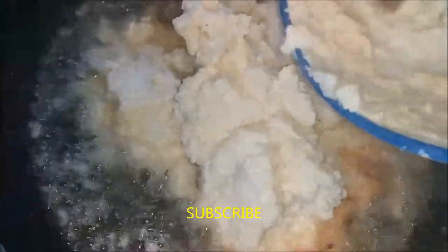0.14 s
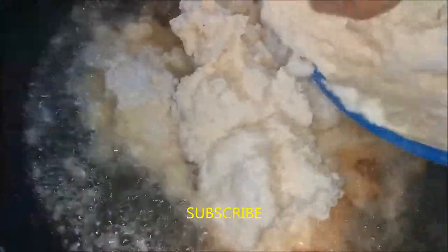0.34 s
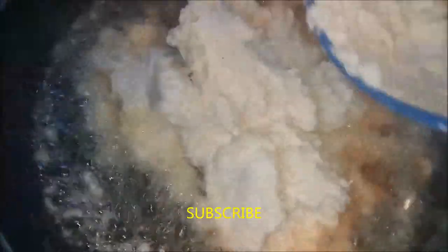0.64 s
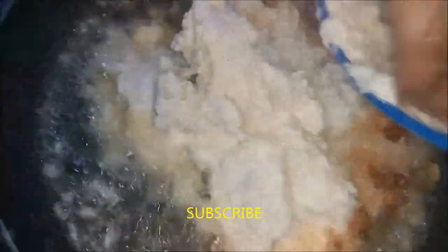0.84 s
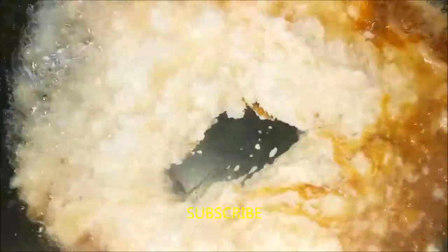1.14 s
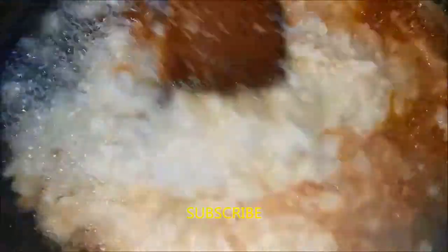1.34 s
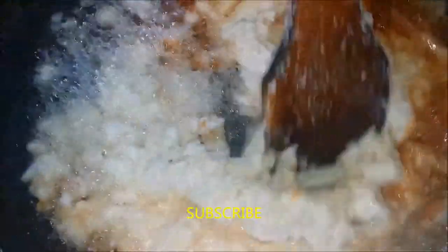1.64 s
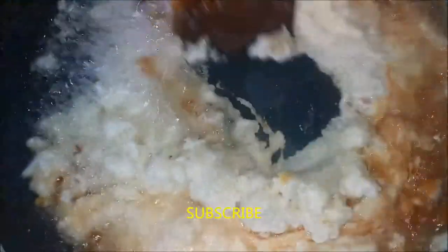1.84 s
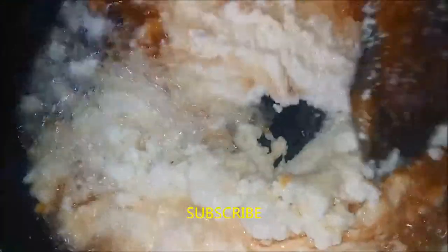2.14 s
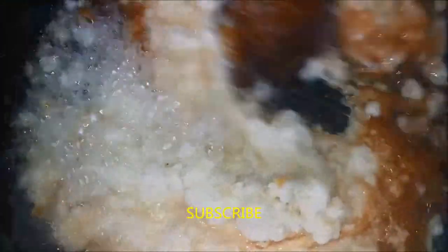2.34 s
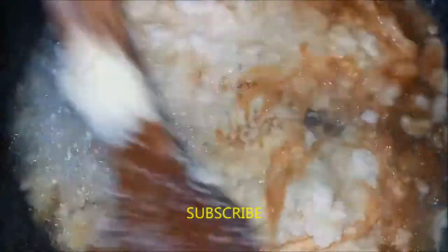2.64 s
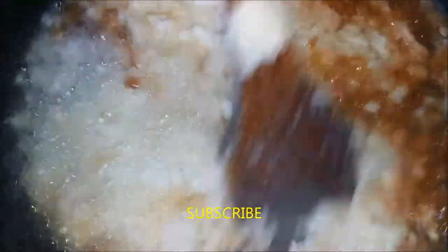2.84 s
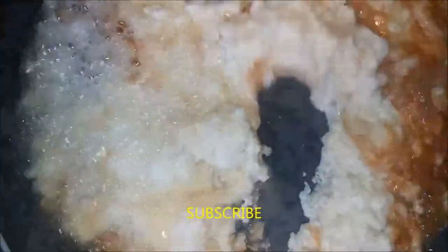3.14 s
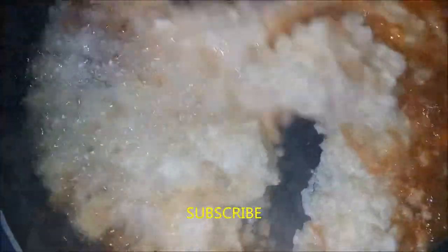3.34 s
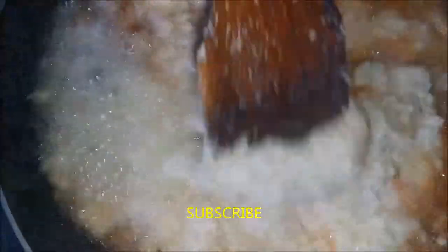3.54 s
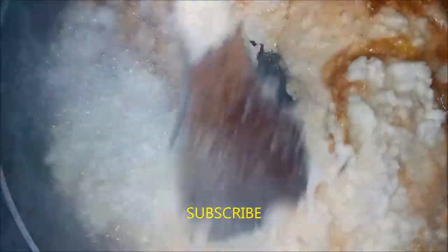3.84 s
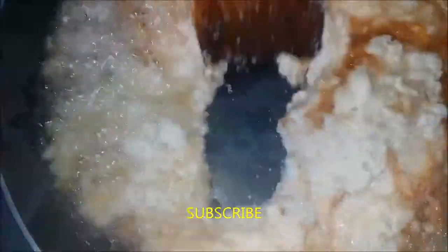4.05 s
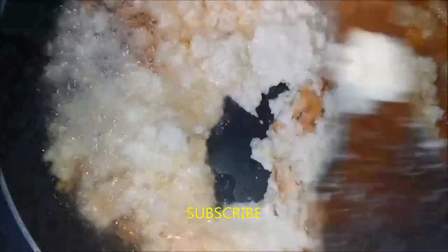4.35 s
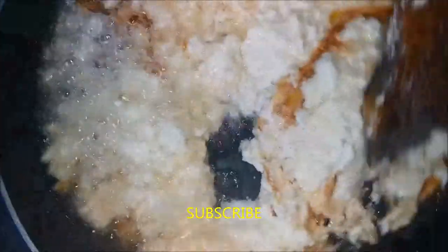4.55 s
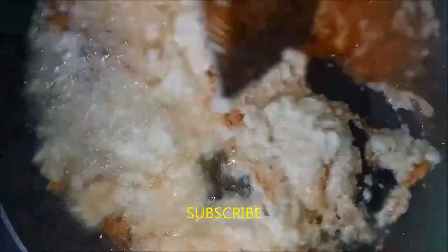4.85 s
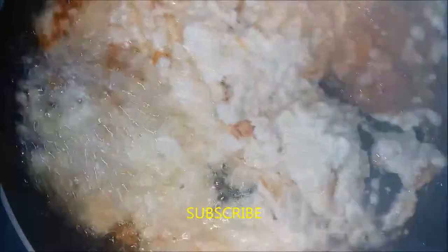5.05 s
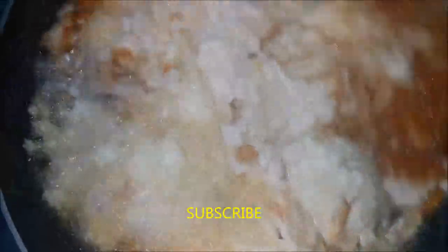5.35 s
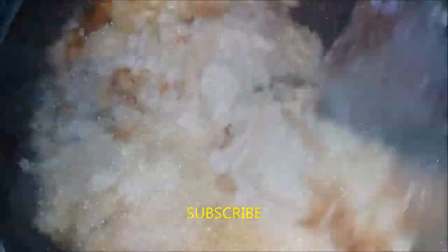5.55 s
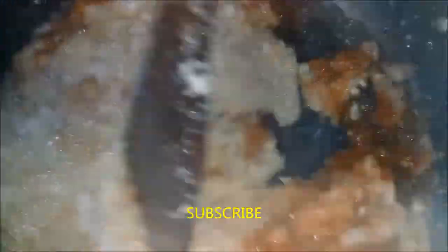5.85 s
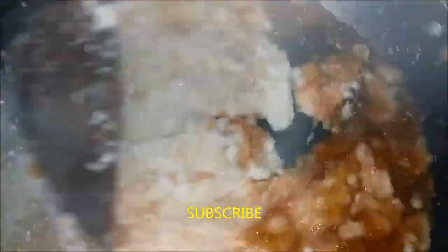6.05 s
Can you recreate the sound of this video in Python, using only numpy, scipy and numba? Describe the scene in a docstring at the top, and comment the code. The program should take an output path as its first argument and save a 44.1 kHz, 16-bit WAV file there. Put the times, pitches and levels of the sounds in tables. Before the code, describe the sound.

Loud, dense sizzling in a pan cuts suddenly to a finer, crisp frying fizz, with snapping drops, bursting steam pockets and soft wooden taps.

```python
"""Hot oil and syrup boil hard, close by, for about a second as wet semolina slides in: ringing bubbles and clicks.
After a cut the pan is being stirred: fine damped-sine bubbles and clicks fizz on the metal, slower ones simmer.
Water drops spit (snap, ringing cavity, noise), steam pockets pop (short sine swings), squeezed steam bubbles
sink in pitch, and a wooden spatula knocks dully (damped pan modes). Filtered noise is the low stove rumble."""
import sys
import numpy as np
from scipy import signal
from scipy.fft import rfft, irfft
from scipy.io import wavfile
from scipy.ndimage import uniform_filter1d
from numba import njit

SR = 44100
rng = np.random.default_rng(int(sys.argv[2]) if len(sys.argv) > 2 else 0)


def master_out(mix):
    """Clip the mix to full scale and print it as 16-bit PCM to the path in sys.argv[1]."""
    frames = np.transpose(np.atleast_2d(mix))
    ceiling = np.clip(frames, -1, 1)
    pcm = np.round(ceiling * 32767).astype(np.int16)
    wavfile.write(sys.argv[1], SR, pcm)


N = 273420
TIME = np.arange(N) / SR
BOIL_END_S = .94


def undb(db):
    """Logarithmic level: decibels to amplitude gain."""
    return 10 ** (np.asarray(db) / 20)


def unit(x):
    """Normalisation of power: scale to rms 1."""
    return x / np.sqrt(np.mean(x ** 2))


def curves(table):
    """Linear interpolation: the columns of a table joined by straight lines in time."""
    s, *columns = np.transpose(table)
    return [np.interp(TIME, s, column) for column in columns]


def add(out, s, sound, db):
    """Superposition: mix a sound in at a time; db is the rms of its first 4 ms."""
    start = max(int(s * SR), 0)
    part = out[start:start + len(sound)]
    front = sound[:SR // 250]
    part += sound[:len(part)] * undb(db) / np.sqrt(np.mean(front ** 2))


def colour(x, points, size=4096):
    """Minimum-phase filtering through (Hz, dB) points: causal, so that clicks keep their sharp front."""
    hz, db = np.transpose(sorted(points))
    bins = np.maximum(np.arange(size // 2 + 1) * SR / size, 1)
    log_gain = np.log(undb(np.interp(np.log(bins), np.log(hz), db)))
    # folding the cepstrum onto positive time gives the minimum phase
    cepstrum = irfft(log_gain)
    cepstrum[1:size // 2] *= 2
    cepstrum[size // 2 + 1:] = 0
    response = irfft(np.exp(rfft(cepstrum)))
    return signal.fftconvolve(x, response)[:len(x)]


def walk(rate):
    """Random fluctuation: a new level every 1 / rate s, joined by ramps; rms 1."""
    hold = max(int(SR / rate), 1)
    levels = np.repeat(rng.standard_normal(N // hold + 1), hold)
    return unit(uniform_filter1d(levels, hold)[:N])


def fade(t, t60):
    """Exponential decay: down 60 dB after t60 seconds."""
    return np.exp(-np.log(1000) * t / t60)


def echoes(x, t60, db):
    """Reverberation: the direct sound and a dense noise tail of reflections, db relative to it."""
    t = TIME[:SR // 2]
    tail = rng.standard_normal(len(t)) * fade(t, t60) * (1 - fade(t, t60 / 10))
    return x + undb(db) * signal.fftconvolve(x, tail / np.linalg.norm(tail))[:len(x)]


@njit
def ring(starts, hz, cycles, sizes, glide):
    """Bubble resonance: each bubble is a damped sine that rises in pitch as it opens."""
    out = np.zeros(N)
    for k in range(len(starts)):
        length = int(cycles[k] * SR / hz[k]) + 2
        step = 2 * np.pi * hz[k] / SR
        # each sample turns and shrinks the phasor; the turn itself grows by the glide
        turn, bend = np.exp(1j * step - 5.75 / length), np.exp(1j * step * glide / length)
        phasor = sizes[k] + 0j
        for i in range(starts[k], min(starts[k] + length, N)):
            out[i] += phasor.imag
            phasor *= turn
            turn *= bend
    return out


def bubbles(per_s, low_hz, high_hz, cycles, spread_db, glide, cap=4.0):
    """Incoherent sum of ringing bubbles at random times, with even energy per Hz; spread_db makes sizes unequal."""
    when, pitch, life, size, side = rng.random((int(per_s * N / SR), 5)).T
    hz = low_hz * (min(high_hz, SR * .42) / low_hz) ** pitch
    turns = cycles * 2 ** (2 * life - 1)
    size_gain = undb(-spread_db * np.log(size + np.exp(-cap)))
    sizes = size_gain * hz / np.sqrt(turns) * np.sign(side - .5)
    return unit(ring((when * N).astype(np.int64), hz, turns, sizes, float(glide)))


def crackle(per_s, spread_db, cap=6.0):
    """Impulse noise: the tiniest bursts are bare clicks."""
    when, size, side = rng.random((int(per_s * N / SR), 3)).T
    sizes = undb(-spread_db * np.log(size + np.exp(-cap))) * np.sign(side - .5)
    return unit(np.bincount((when * N).astype(int), sizes, N))


# Vigour of the first hard boil. Each row: time in seconds, level in dB before the froth offset.
BOIL = [(0.0, -22), (0.224, -26.5), (0.458, -24.5), (0.656, -20.5), (0.764, -21.5), (0.93, -21.5)]
# Spectra of froth and spray. Each row: frequency in Hz, relative level in dB per Hz.
BOIL_COLOUR = [(60, -51), (110, -29), (300, -21.5), (700, -11.5), (880, -9.5), (1120, -6), (2100, 1),
               (3300, -5), (4700, -8.5), (6300, -22), (9000, -54)]
SPRAY_COLOUR = [(3500, -15), (6300, -4), (7300, -3), (8300, 2.5), (9200, -2.5), (10200, -10), (11200, -15),
                (12500, -5.5), (13800, -5), (15200, -7), (16000, -16)]
BOIL_USUAL_DB, FROTH_OFFSET_DB = -22, 1
SPRAY_DB, SPRAY_SLOPE = -32, 0.63  # level at time 0 and the usual boil; dB per dB of boil
SPRAY_RISE_DB_PER_S = 4.5  # the spray builds up as more paste slides in


def hard_boil():
    """Boiling by flash evaporation: water leaves the fresh paste in ringing bubbles and throws up a spray of oil."""
    vigour_db = curves(BOIL)[0]
    froth_db = vigour_db + FROTH_OFFSET_DB
    spray_db = SPRAY_DB + SPRAY_SLOPE * (vigour_db - BOIL_USUAL_DB) + SPRAY_RISE_DB_PER_S * TIME
    froth = bubbles(per_s=4500, low_hz=150.3, high_hz=7400, cycles=20, spread_db=0.0, glide=0.088)
    # a few big bubbles ring on longer, out of the froth
    big = bubbles(per_s=130, low_hz=1128, high_hz=3030, cycles=95, spread_db=3.0, glide=0.11, cap=1.9)
    froth = unit(unit(colour(froth, BOIL_COLOUR)) + undb(-9) * big)
    froth *= undb(froth_db + 0.59 * walk(45.7))
    spray = crackle(per_s=8100, spread_db=4.5)
    spray += undb(-7) * bubbles(per_s=3500, low_hz=5570, high_hz=16100, cycles=21, spread_db=1.0, glide=.05)
    spray = unit(colour(spray, SPRAY_COLOUR)) * undb(spray_db + 1.0 * walk(59.4))
    # first touch of the oil: a band of small bubbles that slowly weakens
    touch = bubbles(per_s=2500, low_hz=3650, high_hz=5470, cycles=27, spread_db=-0.5, glide=.08)
    return froth + spray + touch * undb(-32.0) * fade(TIME, 6.7)


# Spectrum of the rumble. Each row: frequency in Hz, relative level in dB per Hz.
STOVE_COLOUR = [(20, -36), (40, -24), (58, 7), (80, 0.5), (110, -1), (144, 11), (185, 0.5), (300, -21),
                (600, -21.5)]


def stove():
    """Filtered noise with random modulation: a low, slightly unsteady rumble."""
    rumble = unit(colour(rng.standard_normal(N), STOVE_COLOUR))
    return rumble * undb(-59 + 2.0 * walk(5.76))


# Single water drops, loud and soft, at set times. Each row: start in seconds, level in dB before a small trim,
# pitch in Hz, share of ringing from 0 to 1.
SPITS = [(0.1021, -25, 12500, 0.7), (0.2071, -17.5, 2180, 0.83), (0.5085, -25, 13200, 0.95),
         (0.567, -22.5, 12700, 0.4), (0.6512, -19.5, 13000, 0.83), (0.7808, -21.5, 8800, 0.2),
         (0.99, -22, 6460, 0.2), (1.0828, -23.5, 1880, 0.04), (1.2101, -24, 12600, 0.7),
         (1.296, -24.5, 12800, 0.97), (1.541, -20.5, 3380, 0.15), (1.6117, -20.5, 8900, 0.98),
         (2.1076, -29, 12800, 0.5), (2.2027, -24, 7580, 0.05), (2.4771, -18.5, 8100, 0.17),
         (2.5748, -19, 8270, 0.1), (2.794, -25.5, 5510, 0.8), (2.8432, -27, 2210, 0.7),
         (3.0365, -26.5, 7300, 0.95), (3.308, -28, 7670, 0.2), (3.4864, -26.5, 5700, 0.65),
         (3.5627, -31, 1750, 0.93), (3.7078, -21, 5000, 0.3), (3.9622, -25, 4570, 0),
         (4.17, -22.5, 5900, 0.9), (4.2529, -24, 7200, 0.98), (4.3135, -27, 8180, 0.44),
         (4.3513, -28.5, 2110, 1), (4.4371, -20, 12750, 0.96), (5.0369, -28, 5770, 1),
         (5.2892, -27.5, 4820, 0.2), (5.5038, -21, 6760, 0.5), (6.09, -23, 6760, 0.3)]
# Spectral tilt of every spit. Each row: frequency in Hz, gain in dB.
SPIT_COLOUR = [(100, -13.5), (600, -2), (1800, 6.5), (3000, 2), (5000, 2.5), (8300, 5), (10000, -6.5),
               (12800, 0.5), (16000, -6.5)]


def spits():
    """Vapour explosion: a sharp snap, a brief cavity ring and a splatter burst out together."""
    out, t = np.zeros(N), TIME[:2048]
    for s, db, hz, ringing in SPITS + stray_drops():
        ringing = np.clip(ringing, 0, 1)
        snap = np.cos(2 * np.pi * hz * t) * fade(t, 4.5 / hz)
        cavity = np.sin(2 * np.pi * hz * t * (1 + 15 * t)) * fade(t, 17 / hz)
        # the splatter's faint tail, off the pan wall, fades slowest
        splatter = rng.standard_normal(len(t)) * (fade(t, 0.0054) + undb(-18.5) * fade(t, 0.042))
        burst = unit(snap) + undb(7) * unit(splatter)
        spit = np.sqrt(1 - ringing) * burst + np.sqrt(ringing) * unit(cavity)
        add(out, s, colour(spit, SPIT_COLOUR), db + 0.14)
    return out


# Steam pockets bursting through the paste. Each row: start in seconds, level in dB before an offset,
# pitch in Hz, crack level in dB relative to the burst.
POPS = [(0.102, -21.5, 900, -8), (0.518, -20, 700, -8), (0.6512, -19.5, 905, 0), (2.5747, -17.5, 1380, -9),
        (2.7745, -10.5, 1310, 9.5), (3.7072, -23, 1250, -10), (3.8043, -25.5, 1700, -14),
        (4.655, -26, 1000, -14), (4.7973, -22.5, 905, -11), (5.1994, -13, 1180, -18),
        (5.9052, -23.5, 900, -14)]


def pops():
    """Pressure release: a steam pocket tears with a crack and a quick swing; the paste slumps back behind it."""
    out, t = np.zeros(N), TIME[:4096]
    for s, db, hz, crack_db in POPS:
        crack = undb(crack_db) * np.sin(2 * np.pi * 5600 * t) * fade(t, 0.00045)
        burst = np.sin(2 * np.pi * hz * t) * fade(t, 2.2 / hz)
        slump = undb(-10.5) * np.sin(2 * np.pi * 185 * t) * fade(t, 0.0077)
        wobble = undb(-51) * np.sin(2 * np.pi * 72 * t) * fade(t, .12)
        add(out, s, slump + wobble - crack - burst, db - 8.5)
    return out


# Spatula against the pan. Each row: start in seconds, level in dB before a small trim.
KNOCKS = [(0.145, -39), (0.254, -34.5), (1.124, -27.5), (3.803, -32.5), (4.370, -28.5), (4.389, -35)]
# The pan, damped by the paste. Each row: frequency in Hz, relative level in dB, 60 dB decay time in seconds.
PAN_MODES = [(268, -12, 0.23), (370, 4, 0.023), (462, -2, 0.055), (624, 3, 0.027), (1160, 1.5, .025),
             (1890, 2, 0.013)]


def spatula():
    """Modal excitation: wood meets the pan through a cushion of paste and wakes its low modes."""
    out, t = np.zeros(N), TIME[:SR // 3]
    for s, db in KNOCKS:
        knock = np.zeros(len(t))
        for k, (hz, mode_db, t60) in enumerate(PAN_MODES):
            # neighbouring modes start in opposite phase
            knock += (-1) ** k * undb(mode_db) * np.sin(2 * np.pi * hz * t) * fade(t, t60)
        add(out, s, knock, db - .5)
    return out


WET_UNTIL_S, DRYING_S = 1.62, 0.14  # middle and length of the drying


def wetness():
    """Drying as a linear ramp: 1 while the paste is still wet, 0 once it has dried."""
    return np.clip((WET_UNTIL_S - TIME) / DRYING_S + .5, 0, 1)


# Flares where the spatula bares the metal. Each row: start in seconds, hold in seconds, then the changes
# of fizz, mist and medium bubbles in dB.
FLARES = [(1.19, 0.074, 0, 2.5, 3.5), (1.55, 0.097, 2, 3.5, -3), (2.15, 0.061, -2, 0, 5),
          (2.8, 0.071, -1.5, 0, 3), (3.26, 0.14, 2.5, 2, -0.5), (3.833, 0.026, 2, 7.5, 7.5),
          (4.074, 0.072, 0, 0, 5), (4.454, 0.18, 3, 5.5, -1), (5.504, 0.12, 1.5, 2, 0)]
FLARE_ATTACK_S, FLARE_RELEASE_S = 0.015, 0.05  # ramp; exponential time constant after the hold


def flares():
    """Contact boiling: paste lands on bared metal; fizz, mist and medium bubbles shift, hold, die back (dB)."""
    boosts = np.zeros((3, N))
    for s, hold, *boost_db in FLARES:
        attack = np.clip((TIME - s) / FLARE_ATTACK_S, 0, 1)
        release = np.exp(-np.maximum(TIME - s - hold, 0) / FLARE_RELEASE_S)
        boosts += np.outer(boost_db, attack * release)
    return boosts


# Vigour of the frying while stirred. Each row: time in seconds, level in dB.
FRY = [(0.96, -29.5), (1.34, -33), (2.89, -32), (3.06, -35), (3.47, -38), (3.76, -38), (4.07, -34),
       (4.4, -34.5), (4.62, -31), (4.99, -33), (5.18, -32.5), (5.72, -31), (5.97, -32.5), (6.2, -32.5)]
FRY_USUAL_DB = -33
# base levels at the usual vigour; the last is a boost of medium bubbles
FIZZ_DB, SIMMER_DB, MIST_DB, MEDIUM_DB = -33.5, -36.5, -44.5, 1.3
FIZZ_SLOPE, SIMMER_SLOPE, MIST_SLOPE, MEDIUM_SLOPE = 1.23, 0.79, 1.15, -0.1  # dB per dB of frying
WET_FIZZ_DB, WET_SIMMER_DB, WET_MIST_DB, WET_MEDIUM_DB = 1.7, -0.7, -1.0, -4  # what wet paste adds
MIST_RISE_DB_PER_S, SIMMER_FALL_DB_PER_S = 0.53, 0.16  # both as the paste dries out


def fry_levels():
    """Heat and moisture control: vigour and wetness set fizz, simmer, mist and medium bubbles (dB)."""
    vigour = curves(FRY)[0] - FRY_USUAL_DB
    wet = wetness()
    fizz_flare, mist_flare, medium_flare = flares()
    fizz_db = FIZZ_DB + FIZZ_SLOPE * vigour + WET_FIZZ_DB * wet + fizz_flare
    simmer_db = SIMMER_DB + SIMMER_SLOPE * vigour + WET_SIMMER_DB * wet - SIMMER_FALL_DB_PER_S * TIME
    mist_db = MIST_DB + MIST_SLOPE * vigour + WET_MIST_DB * wet + MIST_RISE_DB_PER_S * TIME + mist_flare
    medium_db = MEDIUM_DB + MEDIUM_SLOPE * vigour + WET_MEDIUM_DB * wet + medium_flare
    return fizz_db, simmer_db, mist_db, medium_db


WET_COARSE_DB, DRY_COARSE_DB = 0.5, -4.0  # gain of the coarsest fizz bubbles in wet and in dry paste


def band(x, low_hz, high_hz):
    """Zero-phase band-pass filtering: the band stays in step with its source."""
    return signal.sosfiltfilt(signal.butter(2, [low_hz, high_hz], "band", fs=SR, output="sos"), x)


def thin_coarse(fizz):
    """Moisture-limited bubble growth: the share of coarse bubbles in the fizz falls as the paste dries."""
    coarse_db = DRY_COARSE_DB + (WET_COARSE_DB - DRY_COARSE_DB) * wetness()
    return fizz + (undb(coarse_db) - 1) * band(fizz, 2600, 3900)


# Spectra of simmer, fizz and mist. Each row: frequency in Hz, relative level in dB per Hz.
SIMMER_COLOUR = [(120, -37), (200, -15.5), (326, -11.5), (432, -6.5), (650, -3.5), (843, -5.5), (923, 0),
                 (1300, -2), (1570, 1), (2450, -4.5), (3000, -12.5), (3900, -14), (6600, -120)]
FIZZ_COLOUR = [(1500, -32), (2500, -8), (3400, 0.5), (4100, -1), (4800, -0.5), (5800, -2.5), (7200, 1),
               (8200, 3.5), (8700, -1), (9300, -8), (10000, -17.5), (11500, -30), (15000, -57)]
MIST_COLOUR = [(6000, -42), (9500, -12), (10800, -5.5), (12500, 0), (14500, -4), (16000, -5)]


def frying():
    """Nucleate boiling: slow bubbles simmer in the paste; on bare metal they are small, quick and crackling."""
    fizz_db, simmer_db, mist_db, medium_db = fry_levels()
    flurry_db = .5 * walk(40)
    clicks = echoes(crackle(per_s=2400, spread_db=3.0), t60=0.022, db=1)
    simmer = bubbles(per_s=4500, low_hz=198.0, high_hz=3510, cycles=11.6, spread_db=2.0, glide=0.13)
    simmer = unit(colour(simmer + undb(-5.5) * clicks, SIMMER_COLOUR))
    fizz = bubbles(per_s=5000, low_hz=2160, high_hz=10920, cycles=13.7, spread_db=3.0, glide=0.075, cap=6.0)
    fizz = unit(colour(fizz + undb(-1.0) * clicks, FIZZ_COLOUR))
    # the share of medium-sized bubbles changes as the spatula bares and covers the metal
    medium = band(fizz, 4400, 7200)
    fizz = thin_coarse(fizz) + (undb(medium_db) - 1) * medium
    # the finest mist has sparse, very sharp ticks of its own
    ticks = echoes(crackle(per_s=250, spread_db=13.0, cap=4.1), t60=0.009, db=-17)
    mist = bubbles(per_s=5500, low_hz=8700, high_hz=16500, cycles=12, spread_db=9.5, glide=.03)
    mist = unit(colour(mist + undb(3) * clicks + undb(-9.0) * ticks, MIST_COLOUR))
    # final balance of the three layers, in dB
    return (simmer * undb(simmer_db + flurry_db - 0.88)
            + fizz * undb(fizz_db + flurry_db - 0.57)
            + mist * undb(mist_db + flurry_db + 2.0))


def spatter():
    """Random point process: smaller drops go off many times a second, following the level of the fizz."""
    fizz_db = fry_levels()[0]
    pings = bubbles(per_s=32, low_hz=3800, high_hz=8500, cycles=20, spread_db=2.2, glide=.05, cap=2.5)
    snaps = echoes(crackle(per_s=26, spread_db=2.0, cap=2.5), t60=.008, db=-5)
    snaps = unit(colour(snaps, SPIT_COLOUR))
    plips = bubbles(per_s=9, low_hz=1010, high_hz=2610, cycles=16, spread_db=2.5, glide=0.087, cap=2.5)
    return (undb(-11) * pings + undb(-13) * snaps + undb(-20) * plips) * undb(fizz_db)


def pinpricks():
    """Small-bubble resonance: the tiniest drops burst with very high, sharp ticks, following the mist."""
    ticks = bubbles(per_s=16, low_hz=11800, high_hz=14200, cycles=9, spread_db=4.0, glide=.03, cap=2.3)
    return ticks * undb(fry_levels()[2] - 9)


STRAY_PER_S, STRAY_DB, STRAY_SPREAD_DB = 6, 4, 1.5  # level over the frying, and its spread either way
STRAY_HZ, STRAY_OCTAVES, STRAY_RINGING = 6600, 0.32, 0.91  # middle pitch, spread, largest ringing share


def stray_drops():
    """Random arrivals: further drops, as rows like those of SPITS, spit harder when the frying is lively."""
    stirring_s = N / SR - BOIL_END_S
    when, size, pitch, ringing = rng.random((int(STRAY_PER_S * stirring_s), 4)).T
    s = BOIL_END_S + when * stirring_s
    db = np.interp(s, *np.transpose(FRY)) + STRAY_DB + STRAY_SPREAD_DB * (2 * size - 1)
    hz = STRAY_HZ * 2 ** (STRAY_OCTAVES * (2 * pitch - 1))
    return list(zip(s, db, hz, STRAY_RINGING * ringing))


# Spatula strokes that squeeze steam out of the paste. Each row: start in seconds, end in seconds,
# first pitch in Hz, last pitch in Hz, level in dB over the stroke.
SQUEEZES = [(2.137, 2.46, 1480, 1130, -42), (2.4, 2.998, 1970, 1660, -42), (4.432, 4.622, 2440, 2100, -41),
            (4.483, 4.685, 1770, 1470, -39.5), (5.26, 5.544, 1660, 1210, -44)]


def squeezes():
    """Cavity resonance: under the spatula bubbles are near one size; pitch sinks as the pocket widens."""
    out = np.zeros(N)
    for start, end, first_hz, last_hz, db in SQUEEZES:
        when, chance = rng.random(400), rng.standard_normal((400, 2)).T
        hz = (first_hz + (last_hz - first_hz) * when) * 2 ** (0.15 * chance[0])
        starts = ((start + (end - start) * when) * SR).astype(np.int64)
        # the swarm swells and fades over the stroke
        sizes = chance[1] * np.sin(np.pi * when) ** .5
        swarm = ring(starts, hz, np.full(len(hz), 16.), sizes, 0.06)
        # rms over the whole length becomes rms over the stroke
        out += unit(swarm) * np.sqrt(abs(end - start) * SR / N) * undb(db)
    return out


def scene():
    """Equal-power crossfade: a cut from the hard boil to the stirred, frying pan; the kitchen adds a faint tail."""
    stirred = np.clip((TIME - BOIL_END_S) / .008 + .5, 0, 1)
    boiling_pan = hard_boil()
    stirred_pan = frying() + spatter() + pinpricks()
    pan = np.sqrt(1 - stirred) * boiling_pan + np.sqrt(stirred) * stirred_pan
    pan = pan + squeezes() + spits() + pops() + spatula()
    return (echoes(pan, t60=0.34, db=-15) + stove())[None]


TOP_HZ = 15900


def record(dry):
    """Band limitation: the microphone loses the deepest bass; the recorder cuts the top."""
    thin = signal.sosfilt(signal.butter(3, 48, "high", fs=SR, output="sos"), dry)
    return signal.sosfilt(signal.ellip(10, .2, 70, TOP_HZ, fs=SR, output="sos"), thin)


dry = scene()
out = record(dry)
master_out(out)
```